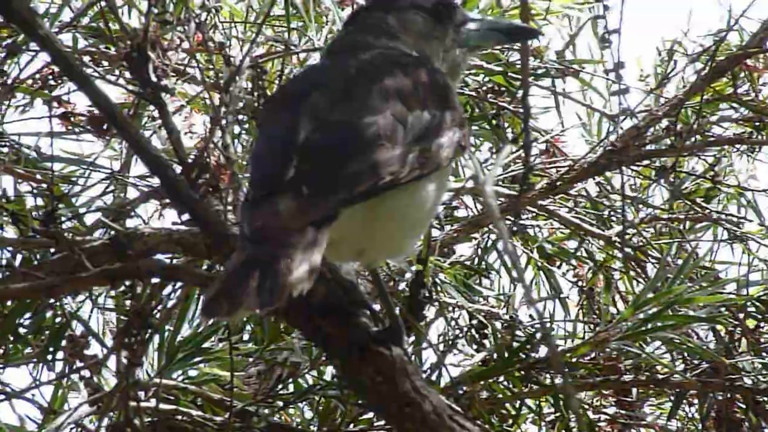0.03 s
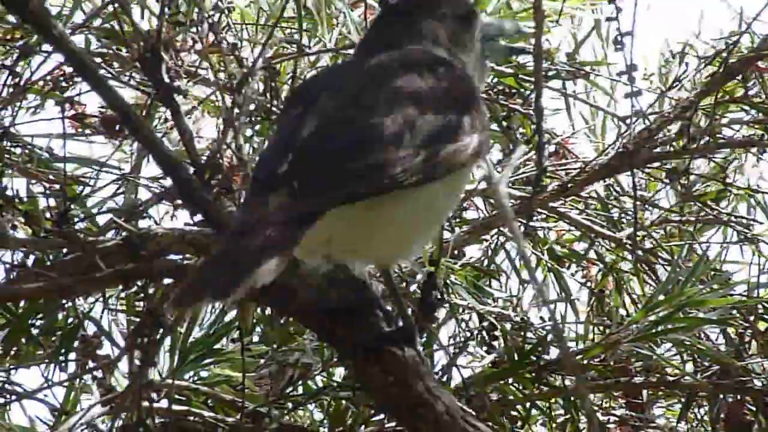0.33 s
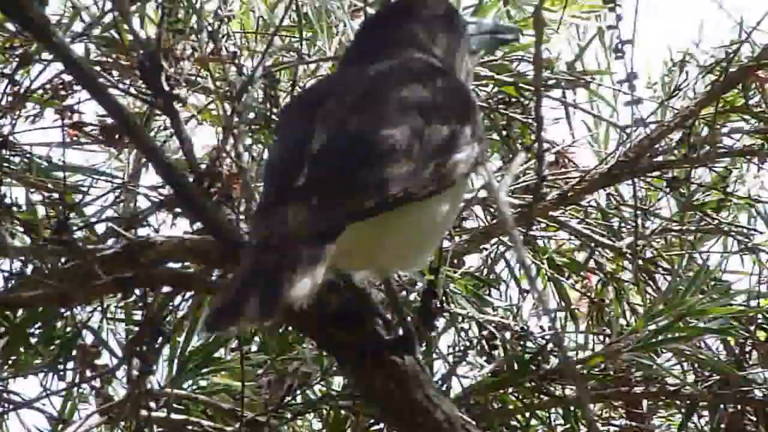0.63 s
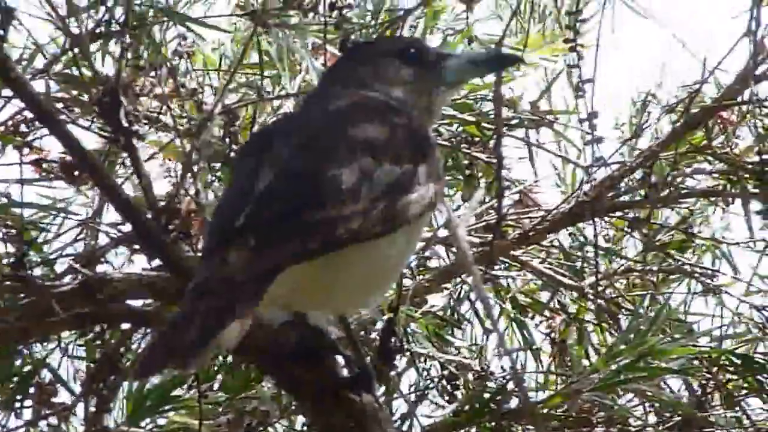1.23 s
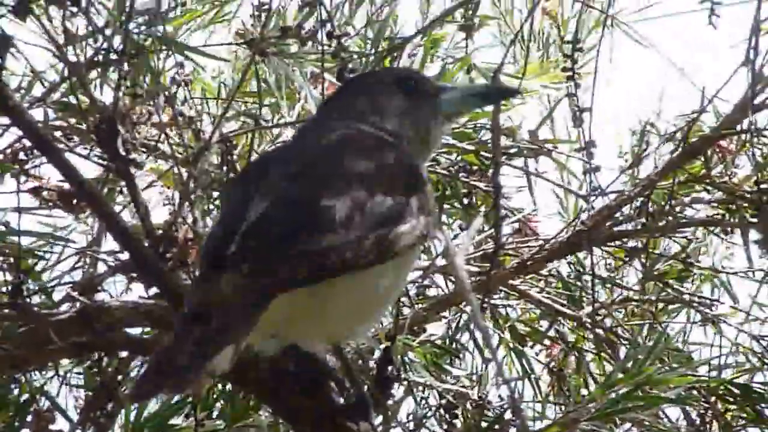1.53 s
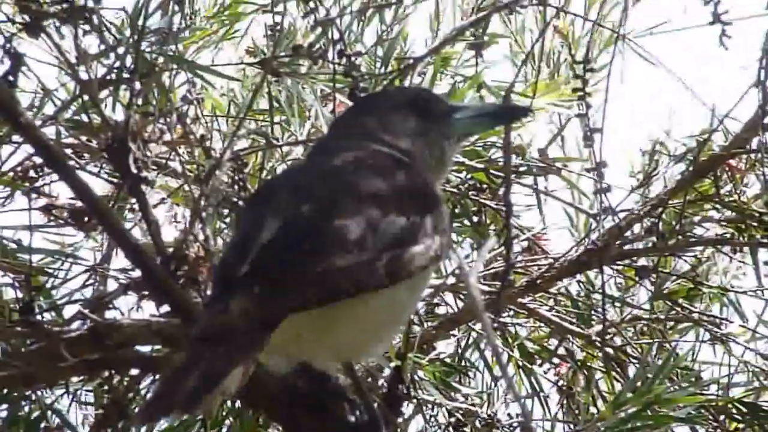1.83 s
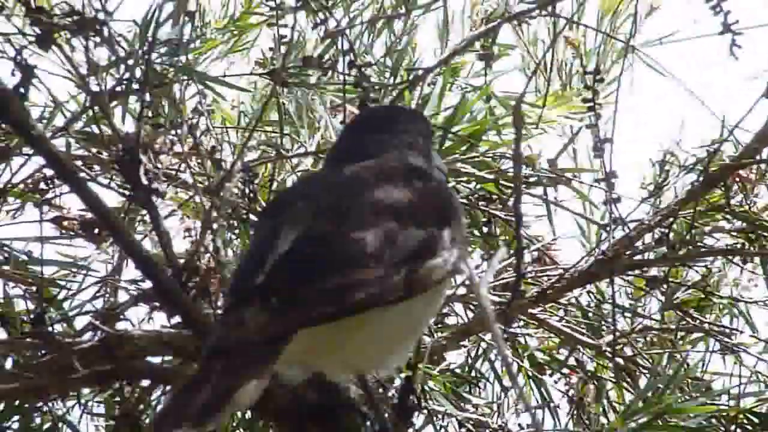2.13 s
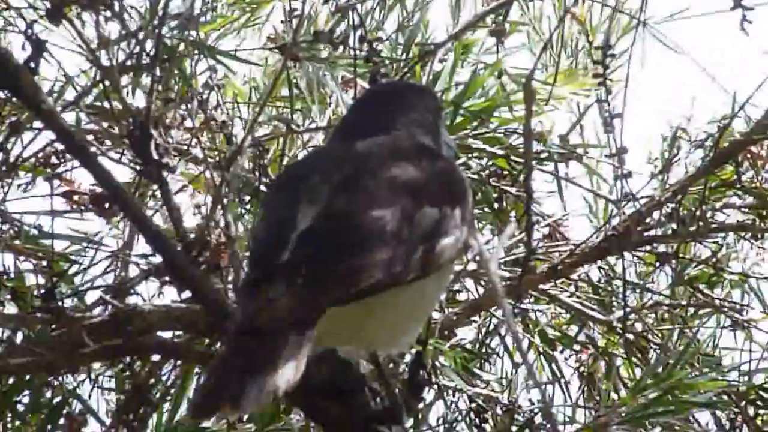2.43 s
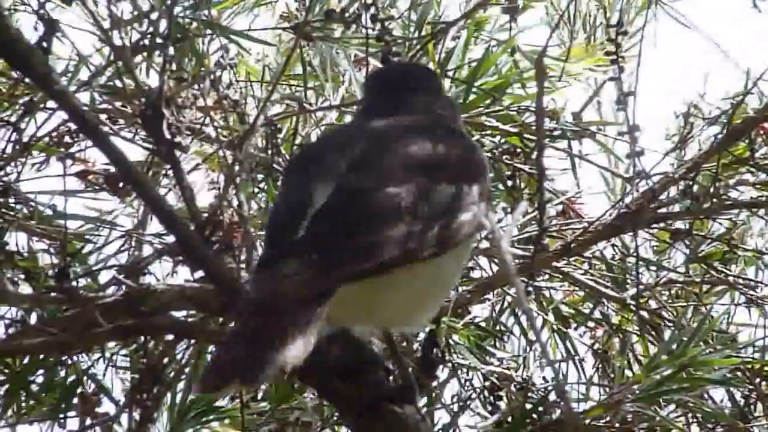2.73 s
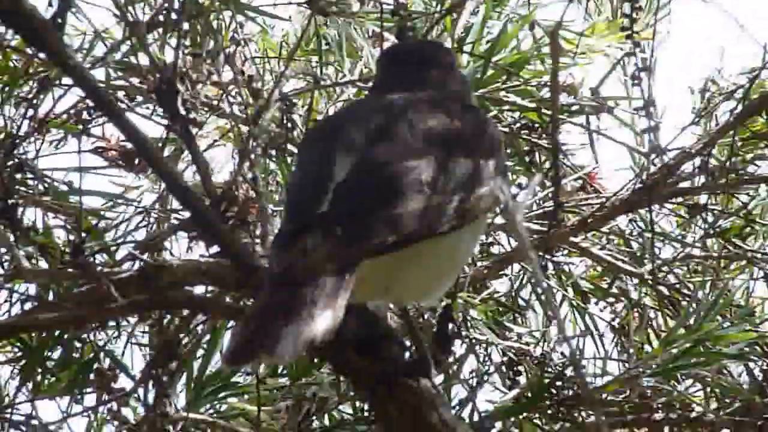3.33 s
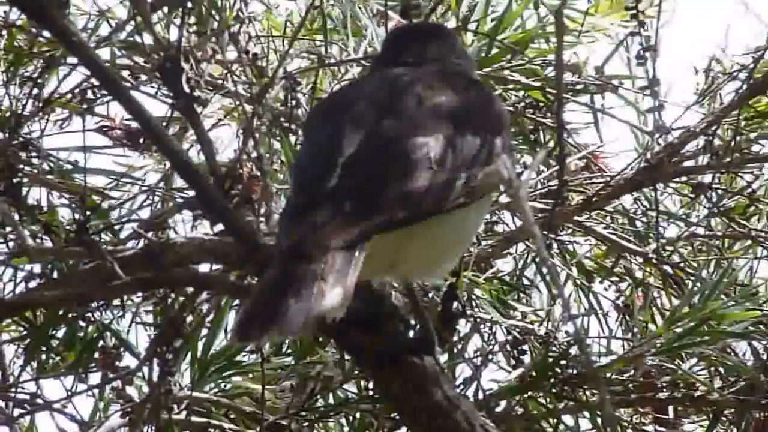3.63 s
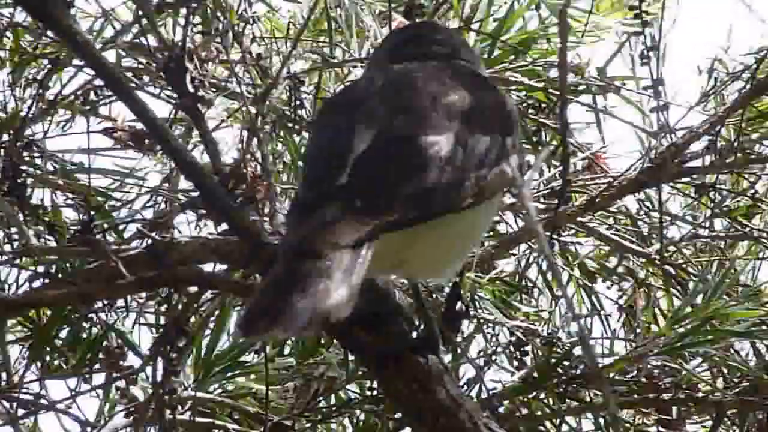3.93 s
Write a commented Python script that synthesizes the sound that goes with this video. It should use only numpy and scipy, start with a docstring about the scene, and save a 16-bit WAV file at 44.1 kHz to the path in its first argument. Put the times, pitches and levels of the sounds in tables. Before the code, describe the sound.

Birds give short rising chirps in a tree over a steady wash of distant traffic.

```python
"""A steady wash of distant traffic comes first, with one droning engine that slowly fades away.
An insect rasps in long-short pairs, then stops. Birds in a leafy tree trade short rising chirps:
slurred ones from the left, sharper ones with a final flick mostly from the right.
The leaves scatter each call, and a thin high whine comes and goes. Traffic and insect are
filtered noise; the engine is a stack of tones, and each chirp is a sliding whistle."""
import sys
import numpy as np
from scipy import signal
from scipy.fft import rfft, irfft
from scipy.io import wavfile

SR = 44100
rng = np.random.default_rng(int(sys.argv[2]) if len(sys.argv) > 2 else 0)


def pcm_store(signal):
    """Save signal as 16-bit PCM."""
    levels = np.round(np.clip(np.atleast_2d(signal), -1, 1) * 32767)
    wavfile.write(sys.argv[1], SR, levels.astype(np.int16).T)


N = 176400
T = np.arange(N) / SR


def from_db(db):
    """Turn decibels into a number to multiply by."""
    return 10 ** (np.asarray(db) / 20)


def unit_level(x):
    """Scale a signal to an average power of 1."""
    return x / np.sqrt(np.mean(x ** 2) + 1e-20)


def in_time(rows):
    """Join a table's rows with straight lines: one curve per column after the time."""
    times, *columns = np.transpose(rows)
    return [np.interp(T, times, column) for column in columns]


def at_hz(points, hz):
    """Read a (frequency, value) table, with octaves evenly spaced."""
    frequencies, values = np.transpose(points)
    return np.interp(np.log(hz), np.log(frequencies), values)


def drift(rate):
    """A smooth random wobble of about 1 either way; a higher rate wobbles faster."""
    r = np.exp(-20 * np.pi * rate / SR)
    slow = signal.lfilter([1], [1, -2 * r, r * r], rng.standard_normal(N // 10 + 4002))[4000:]
    return np.interp(np.arange(N) / 10, np.arange(len(slow)), unit_level(slow))


def band(x, low_hz, high_hz):
    """Keep mainly the sound between two frequencies."""
    return signal.sosfilt(signal.butter(2, [low_hz, high_hz], "band", fs=SR, output="sos"), x)


def gate(t, length, edge_s):
    """Fade in, hold, fade out."""
    return np.sin(np.pi / 2 * np.clip(np.minimum(t, length - t) / edge_s, 0, 1)) ** 2


def panned(x, pan_db):
    """Place a sound: pan is how much louder the left is than the right."""
    return x * unit_level(from_db([[pan_db / 2], [-pan_db / 2]]))


def left_leads(x, radians):
    """Shift the left channel's waves ahead of the right's by the angle radians(hz)."""
    hz = np.arange(N // 2 + 1) * SR / N
    return irfft(rfft(x) * np.exp(.5j * radians(hz) * [[1], [-1]]), N)


# Road noise over time; only each level's swing around its average is used:
# (time [s], rumble [dB], low middle [dB], tyre noise [dB], treble [dB])
TRAFFIC_LEVELS = [(.13, -46, -37, -40, -39.5), (.35, -45, -37.5, -39, -40.5), (.7, -45.5, -37.5, -40, -40),
                  (.95, -46, -38, -38.5, -41.5), (1.15, -44.5, -36, -38, -40.5),
                  (1.36, -44.5, -35.5, -37.5, -40.5), (1.55, -45.5, -38, -37.5, -41.5),
                  (1.9, -45.5, -40, -38.5, -43.5), (2.2, -44, -40, -39.5, -42.5),
                  (2.6, -44.5, -42, -41, -43), (3.3, -45, -43, -39.5, -43.5), (4, -44, -45.5, -39.5, -46)]
# Where those four levels apply: (frequency [Hz])
TRAFFIC_LEVELS_HZ = [220, 540, 1200, 3600]
# The road's tone colour: (frequency [Hz], relative level per hertz [dB])
TRAFFIC_COLOUR = [(40, -46), (62, -33.5), (100, -21.5), (150, -13), (240, -8), (330, -7), (540, -1.5),
                  (800, -3.5), (1100, -3), (1450, -6), (2000, -9.5), (2700, -14.5), (3600, -15),
                  (4600, -17.5), (5600, -19.5), (6500, -21.5), (7600, -42)]
# How alike left and right sound: (frequency [Hz], likeness [0 to 1])
TRAFFIC_LIKENESS = [(60, .94), (200, .98), (500, .96), (1000, .86), (2000, .68), (4000, .46), (7000, 0.52)]
# Which way the road noise leans: (frequency [Hz], pan [dB])
TRAFFIC_PAN = [(100, 1.9), (500, 1.1), (1400, 1.3), (3000, -2.1), (7000, -1.9)]


def traffic():
    """Far road noise, wider in the treble; its low middle sinks as the vehicle leaves."""
    swings_db = np.array([level - level.mean() for level in in_time(TRAFFIC_LEVELS)])
    edges_hz = 40 * 2 ** (np.arange(24) / 3)   # three bands to an octave
    wash, noise = 0, rng.standard_normal((2, 2, N))
    for k, (low, high) in enumerate(zip(edges_hz, edges_hz[1:])):
        middle, side = band(noise[k % 2], low, high)
        hz = np.sqrt(low * high)
        alike = at_hz(TRAFFIC_LIKENESS, hz)
        stereo = np.sqrt(1 + alike) * middle + np.sqrt(1 - alike) * side * [[1], [-1]]
        weights = np.array([np.interp(np.log(hz), np.log(TRAFFIC_LEVELS_HZ), w) for w in np.eye(4)])
        gain = from_db(at_hz(TRAFFIC_COLOUR, hz) + weights @ swings_db + drift(11))
        wash = wash + panned(gain * stereo, at_hz(TRAFFIC_PAN, hz))
    return from_db(-33) * unit_level(wash)


# The engine's run; its resonance is a range of pitches that rings louder:
# (time [s], cycle rate [Hz], gain of tones and hiss [dB], resonance [Hz], its lift [dB], hum [dB])
ENGINE_RUN = [(.13, 29.9, -2, 530, 9, -55), (.3, 30.45, 0, 530, 10, -61), (.5, 31.1, 1, 530, 6, -60),
              (.7, 31.4, 1, 400, 1, -54), (.93, 31.2, -2, 420, 5, -48), (1.12, 30.1, 0, 450, 7, -48),
              (1.22, 31.1, 0, 480, 4, -50), (1.35, 34, 1, 500, 6, -58), (1.43, 34.5, -6, 720, 13, -64),
              (1.6, 34, -12, 760, 14, -66), (2.2, 34, -21, 760, 14, -75), (4, 34.8, -42, 760, 10, -90)]
# The engine's tones: (multiple of the cycle rate, level before gain and lift [dB])
ENGINE_TONES = [(4, -62), (6, -51), (8, -44), (9, -49.5), (10, -52.5), (11, -48), (12, -51), (14, -46.5),
                (15, -47), (16, -52), (17, -49), (18, -47.5), (19, -54), (20, -56), (21, -51), (22, -51),
                (23, -54)]


def engine():
    """A far engine's cycles make a stack of tones; its low hum grows, then it speeds up and fades."""
    cycle_hz, gain_db, resonance_hz, lift_db, hum_db = in_time(ENGINE_RUN)
    phase = 2 * np.pi * np.cumsum(cycle_hz * (1 + .0015 * drift(8.2))) / SR
    drone = from_db(hum_db) * np.sin(5 * phase)   # the low hum
    for multiple, tone_db in ENGINE_TONES:
        octaves_away = np.log2(multiple * cycle_hz / resonance_hz)
        resonance_db = lift_db * np.exp(-(octaves_away / .25) ** 2)
        waver_db = 2 * drift(3.4)
        tone = np.sin(multiple * phase + .5 * drift(3.4))
        drone = drone + from_db(gain_db + tone_db + resonance_db + waver_db) * tone
    hiss = from_db(gain_db - 52) * unit_level(band(rng.standard_normal(N), low_hz=3400, high_hz=4000))
    return panned(drone + hiss, pan_db=2)


# The insect's pairs of rasps: (time [s], level [dB], delay of the short rasp [s])
RASP_PAIRS = [(0.127, -46.5, 0.073), (.306, -47, 0.07), (0.493, -49, 0.058), (.670, -49, 0.055),
              (.840, -48.5, 0.06), (1.009, -47, 0.066), (1.197, -48.5, .067), (1.370, -47, 0.062),
              (1.556, -46, .066), (1.750, -47.5, .071), (1.939, -48, 0.072), (2.126, -48.5, .067),
              (2.316, -46.5, 0.07)]


def insect(long_s=.038, short_s=.015, edge_s=.0033):
    """An insect rasps in pairs: a long and a short burst of high, narrow noise."""
    loudness = sum(from_db(db) * (gate(T - start, long_s, edge_s) + gate(T - start - gap, short_s, edge_s))
                   for start, db, gap in RASP_PAIRS)
    rasp = unit_level(band(rng.standard_normal(N), low_hz=6420, high_hz=7310))
    return panned(loudness * rasp, pan_db=3)


def bird_whistle(hz, main_gain, octave_gain):
    """A bird's voice: a main tone, its octave (twice the pitch) and a trace at three times the pitch."""
    phase = 2 * np.pi * np.cumsum(hz) / SR
    overtones = np.sin(2 * phase) + from_db(-20) * np.sin(3 * phase)
    return main_gain * np.sin(phase) + octave_gain * overtones


# Slurred calls: (time [s], lead-in [s], rise [s], low pitch [Hz], high pitch [Hz], level [dB],
# relative lead-in level [dB], loudest point [share of rise], octave level [dB], pan [dB])
SLURRED_CHIRPS = [(.274, .024, .034, 2540, 3560, -29, -9, .2, -42, 7),
                  (.779, .019, .036, 2380, 3680, -27.3, -5, .65, -38, 10),
                  (1.204, .013, .034, 2400, 3680, -28.3, -3.5, .65, -42, 10),
                  (2.858, .008, .036, 2500, 3500, -42, -5, .45, -49, 3),
                  (3.470, .004, .040, 2430, 3660, -33.5, -9, .65, -45, 8)]


def slurred_chirps():
    """A soft held note slides up and flattens at the top; yields (sample positions, call, pan)."""
    warble = drift(450)
    roughness = from_db(2.5 * warble)   # the level shakes with the pitch
    for start, lead, rise, low, high, db, lead_db, peak, octave_db, pan_db in SLURRED_CHIRPS:
        at = np.flatnonzero((T >= start) & (T < start + lead + rise))
        t = T[at] - start
        progress = (t - lead) / rise
        climb = np.sin(np.pi / 2 * np.clip(progress, 0, 1)) ** 1.3
        hz = (low + (high - low) * climb) * (1 + .018 * warble[at])
        arch_db = np.interp(progress, [-.1, .1, peak, 1], [lead_db, -1, 0, -9])
        shape = roughness[at] * gate(t, lead + rise, edge_s=.005) * from_db(arch_db)
        yield at, bird_whistle(hz, shape * from_db(db), shape * from_db(octave_db)), pan_db


# Sharp calls: (time [s], rise [s], four pitches evenly spaced along the rise [Hz], main level [dB],
# swell up to it [dB], octave level [dB], octave's loudest point [share of rise],
# octave's drop away from that point [dB], flick level [dB], pan [dB], warble [share of pitch])
SHARP_CHIRPS = [(.326, .038, 2270, 2650, 3020, 3350, -36, 10, -35, .75, 5, -65, -10, .006),
                (1.272, .036, 2350, 2590, 2870, 3200, -39, 10, -38, .55, 6, -65, -11, .006),
                (1.656, .035, 2400, 2590, 2900, 3100, -28, 3, -24.5, .7, 12, -30.5, 7, .02),
                (1.919, .038, 2220, 2520, 2820, 3450, -31, 14, -30.5, .42, 12, -40, -11, .004),
                (2.298, .035, 2270, 2480, 2720, 2950, -29.5, 8, -28.5, .62, 11, -36, 6, .016),
                (2.707, .034, 2230, 2480, 2720, 3180, -33.5, 10, -33, .48, 8, -41, -10, .004),
                (3.271, .041, 2280, 2560, 2860, 3430, -30.5, 12, -33, .42, 4, -39, -11, .003),
                (3.827, .041, 2180, 2600, 2980, 3400, -35, 10, -34, .7, 4, -58, -10, .004)]


def sharp_chirps(flick_hz=3900, flick_s=.012, jump_s=.003):
    """A rising whistle swells late, then flicks to a high note; yields (sample positions, call, pan)."""
    warble = drift(450)
    for row in SHARP_CHIRPS:
        start, rise, *pitches, db, swell_db, octave_db, peak, drop_db, flick_db, pan_db, depth = row
        at = np.flatnonzero((T >= start) & (T < start + rise + flick_s))
        t = T[at] - start
        progress = np.clip(t / rise, 0, 1)
        jump = np.clip((t - rise) / jump_s, 0, 1)   # 0 in the slide, 1 in the flick
        pitch_curve = np.polyfit(np.linspace(0, 1, 4), pitches, 3)
        slide_hz = np.polyval(pitch_curve, progress) * (1 + depth * warble[at])
        hz = slide_hz + (flick_hz - slide_hz) * jump
        swell = from_db(db + np.interp(progress, [.42, .86], [-swell_db, 0]))
        main = swell * (1 - jump) ** 2 + from_db(flick_db) * jump ** 2
        near_peak = np.exp(-((progress - peak) / .33) ** 2)
        octave = from_db(octave_db - drop_db * (1 - near_peak)) * (1 - jump) ** 2
        shape = gate(t, rise + flick_s, edge_s=.005)
        yield at, bird_whistle(hz, shape * main, shape * octave), pan_db


def leaf_echoes(x, build_s=.01, fade_s=.29, lowest_hz=4000, ground_s=.038):
    """Many tiny echoes from the leaves, which scatter treble best, and one from the ground."""
    t = T[:SR // 2]
    echoes = rng.standard_normal((2, len(t))) * from_db(-60 * t / fade_s) * np.minimum(t / build_s, 1)
    echoes *= from_db(-.5) / np.sqrt(np.sum(echoes ** 2, axis=1, keepdims=True))
    echoes = signal.sosfilt(signal.butter(2, lowest_hz, "high", fs=SR, output="sos"), echoes)
    echoes[:, int(ground_s * SR)] += from_db(-17.5)
    return signal.fftconvolve(x, echoes, axes=1)[:, :N]


def birds():
    """All calls with a fast flutter; their echoes lean only a little to the caller's side."""
    direct, scattered = 0, 0
    flutter = from_db(2.2 * drift(110))
    for at, chirp, pan_db in [*slurred_chirps(), *sharp_chirps()]:
        call = np.zeros(N)
        call[at] = chirp * flutter[at]
        lead_s = 3e-6 * pan_db   # a call reaches the nearer microphone first
        direct = direct + left_leads(panned(call, pan_db), lambda hz: 2 * np.pi * hz * lead_s)
        scattered = scattered + panned(call, pan_db * .33)
    return direct + leaf_echoes(scattered)


# How the thin high tone comes and goes: (time [s], level [dB])
WHINE_LEVELS = [(1, -78), (1.2, -63), (1.7, -60), (1.92, -52), (2.12, -56), (2.3, -54), (2.65, -62),
                (2.87, -56), (3.2, -64), (3.5, -80)]


def whine():
    """A faint high tone whose pitch wavers slightly."""
    db, = in_time(WHINE_LEVELS)
    hz = 6348 + 4 * drift(25)
    return from_db(db) * np.sin(2 * np.pi * np.cumsum(hz) / SR)


def scene():
    """Traffic and engine behind, with the insect, birds and whine in front."""
    return traffic() + engine() + insect() + birds() + whine()


# How far the left microphone's waves run ahead of the right's: (frequency [Hz], lead [radians])
MICROPHONE_LEAD = [(100, .05), (500, .28), (1460, .8), (2070, 1.0), (3400, .8), (4400, .3), (5400, -.1),
                   (7500, -.1)]


def record(dry, silence_s=.129, cutoff_hz=8300):
    """Two microphones slightly out of step; a moment of silence comes first, and the top treble is cut."""
    heard = left_leads(dry, lambda hz: at_hz(MICROPHONE_LEAD, np.maximum(hz, 1)))
    started = heard * np.clip((T - silence_s) * 1000, 0, 1)
    return signal.sosfilt(signal.cheby2(20, 70, cutoff_hz, fs=SR, output="sos"), started)


dry = scene()
out = record(dry)
pcm_store(out)
```